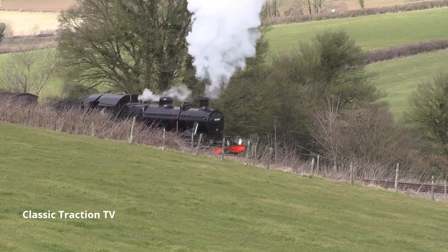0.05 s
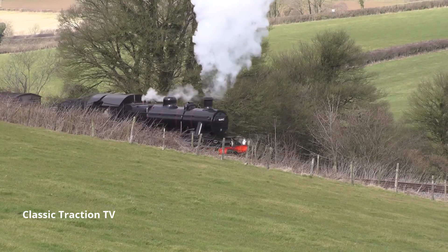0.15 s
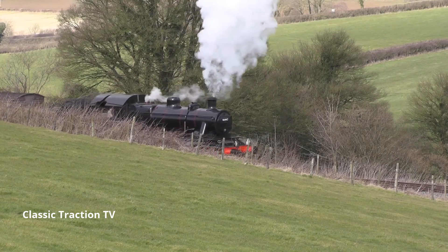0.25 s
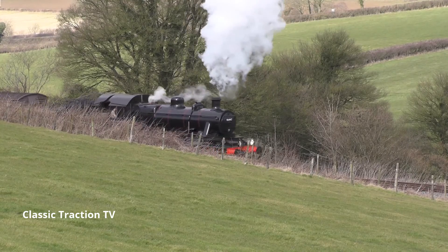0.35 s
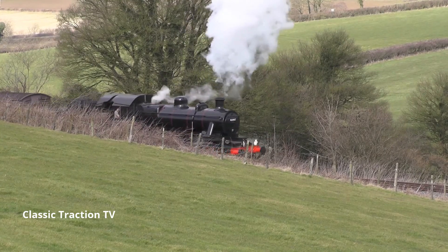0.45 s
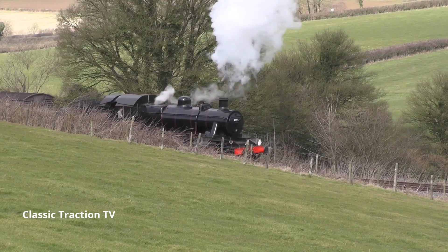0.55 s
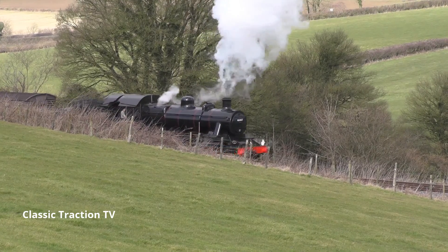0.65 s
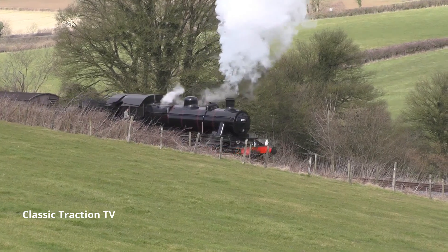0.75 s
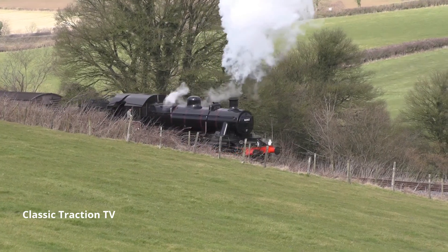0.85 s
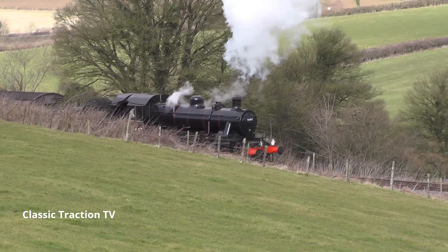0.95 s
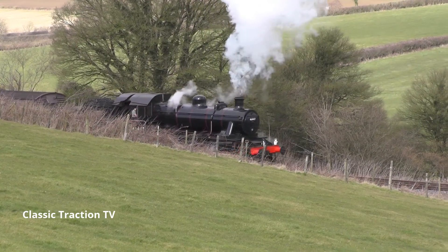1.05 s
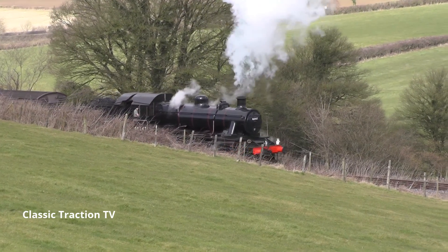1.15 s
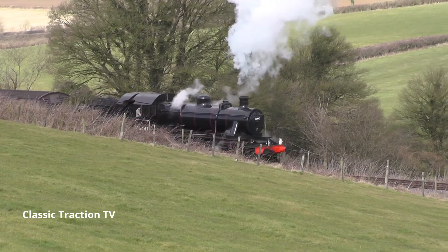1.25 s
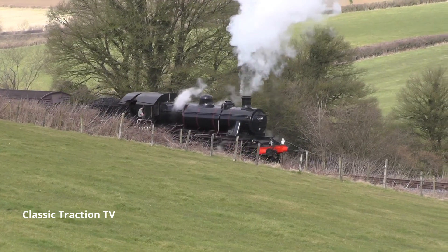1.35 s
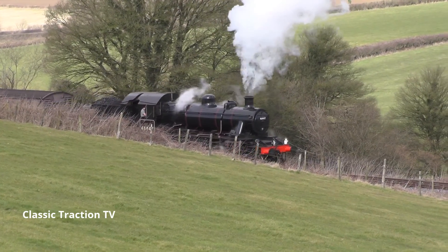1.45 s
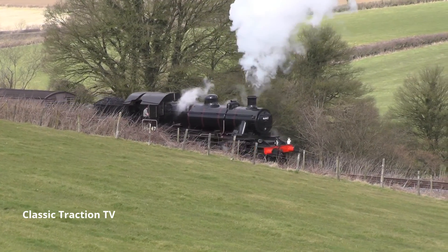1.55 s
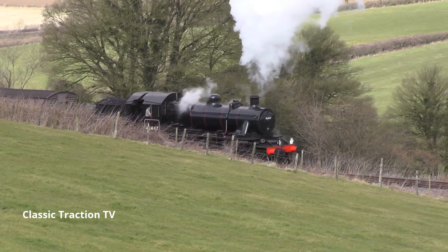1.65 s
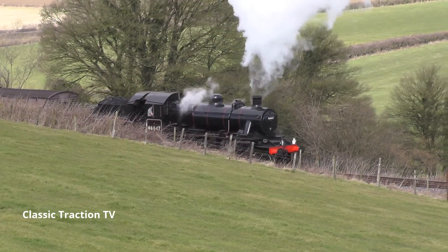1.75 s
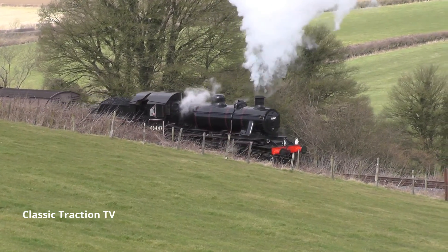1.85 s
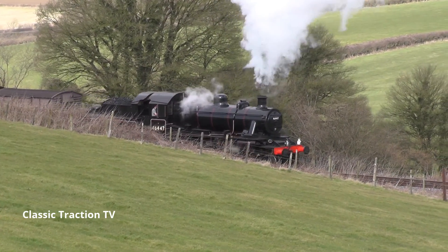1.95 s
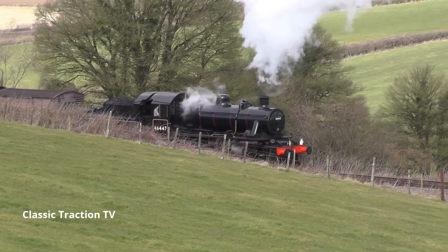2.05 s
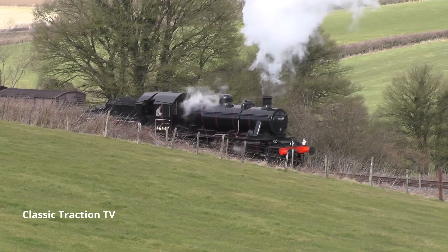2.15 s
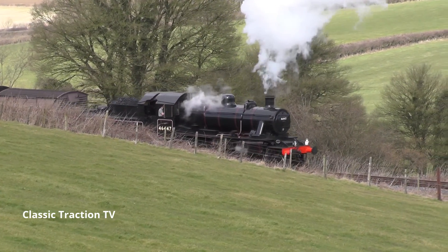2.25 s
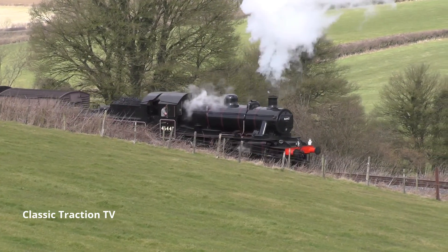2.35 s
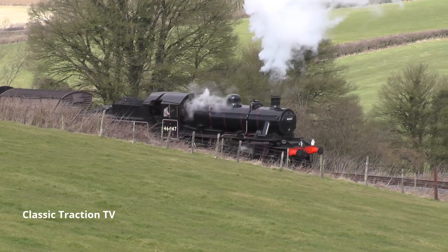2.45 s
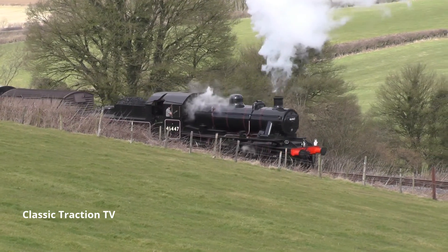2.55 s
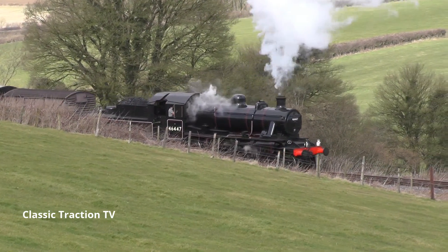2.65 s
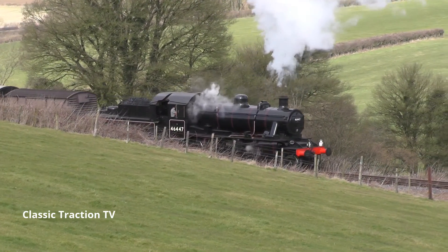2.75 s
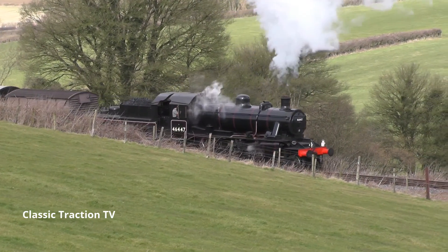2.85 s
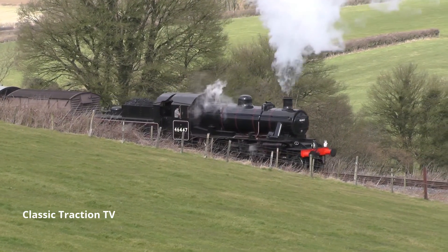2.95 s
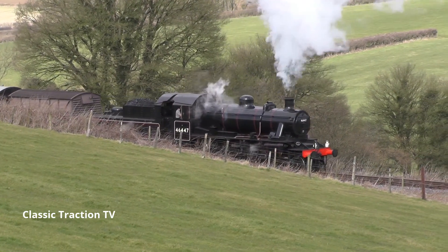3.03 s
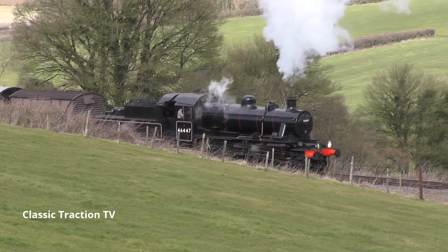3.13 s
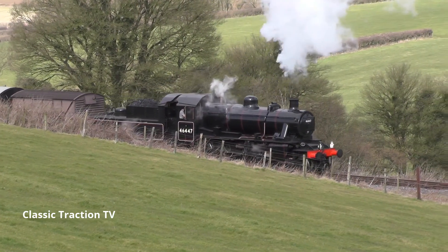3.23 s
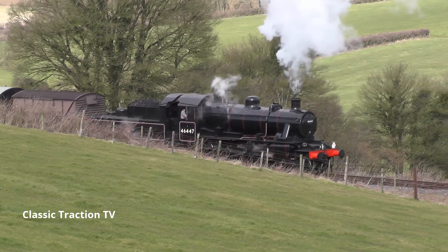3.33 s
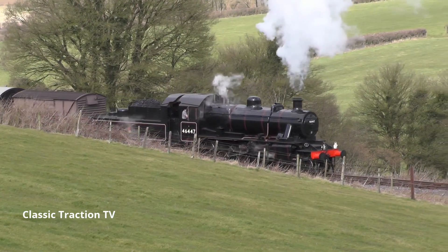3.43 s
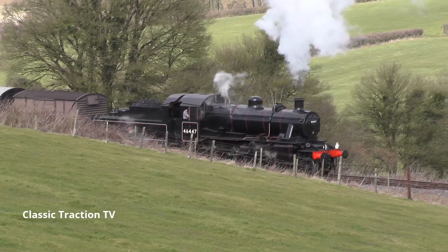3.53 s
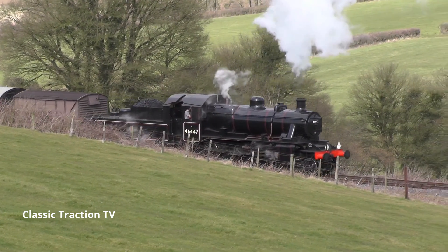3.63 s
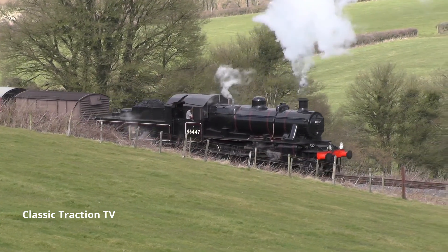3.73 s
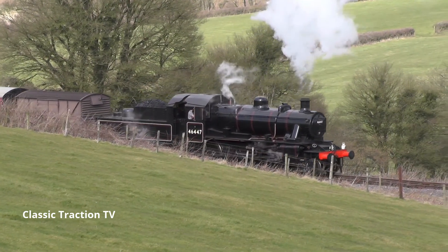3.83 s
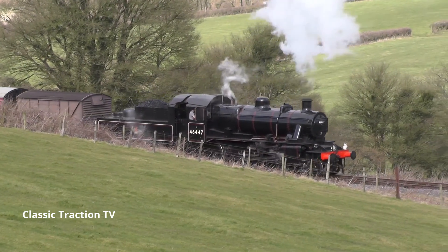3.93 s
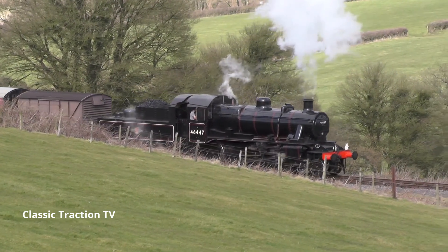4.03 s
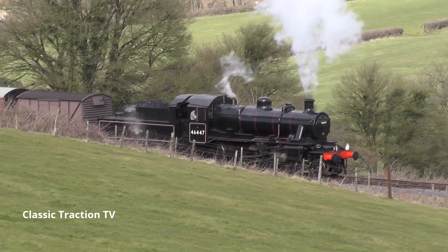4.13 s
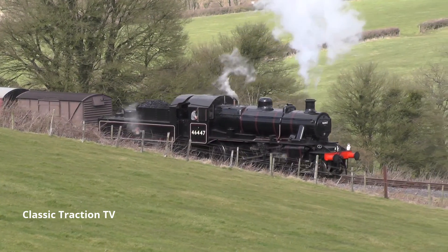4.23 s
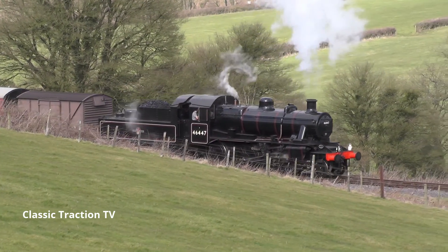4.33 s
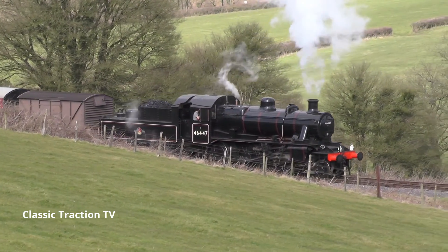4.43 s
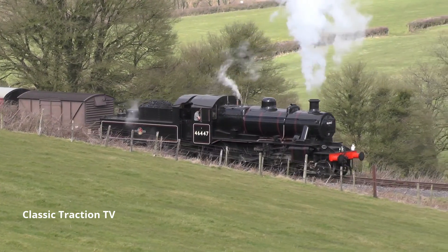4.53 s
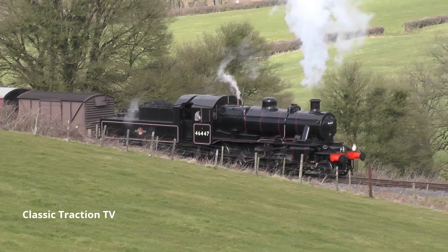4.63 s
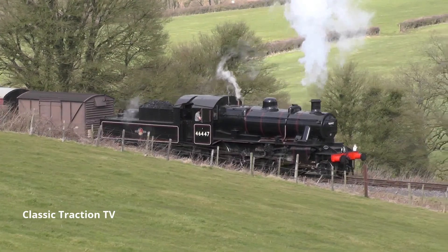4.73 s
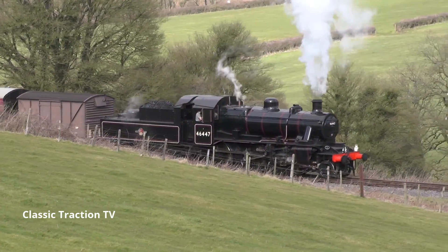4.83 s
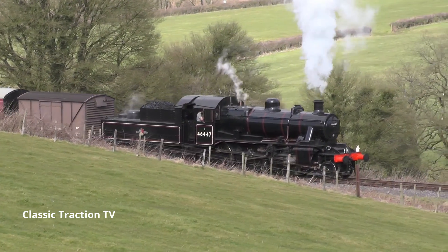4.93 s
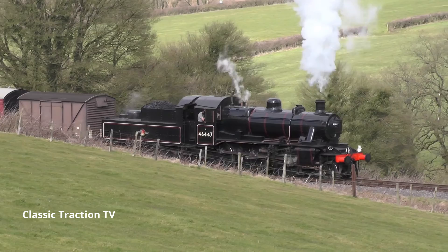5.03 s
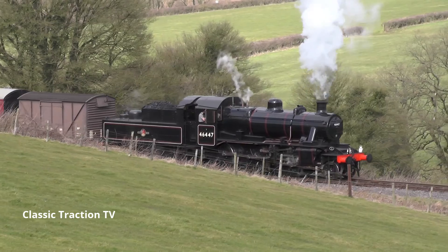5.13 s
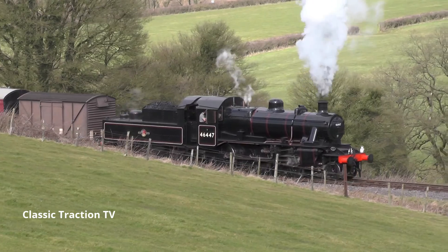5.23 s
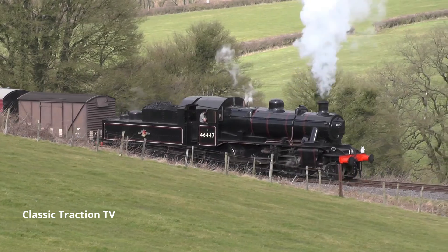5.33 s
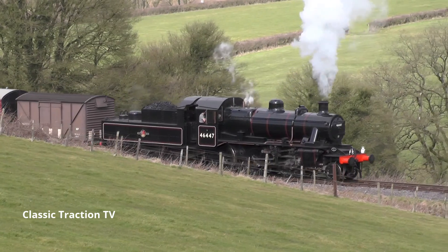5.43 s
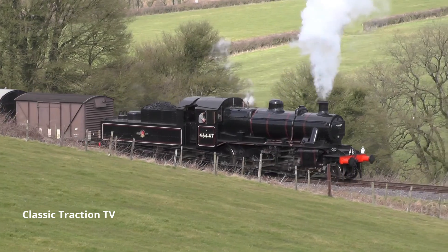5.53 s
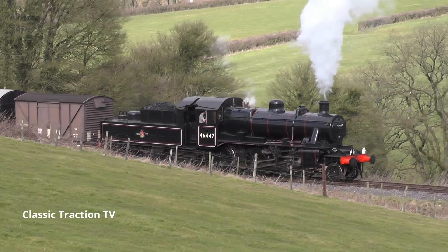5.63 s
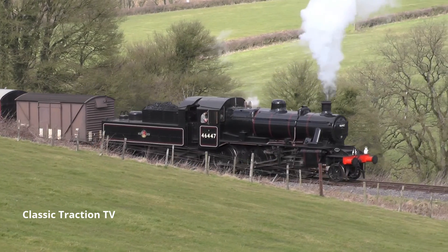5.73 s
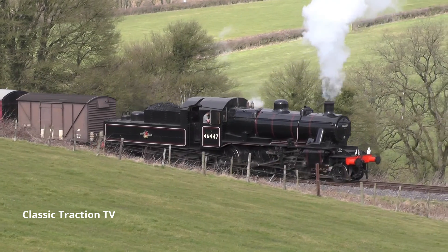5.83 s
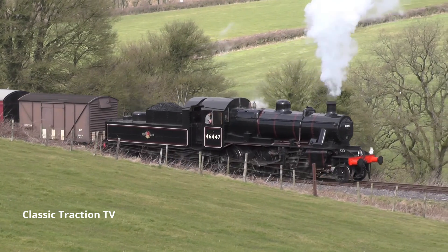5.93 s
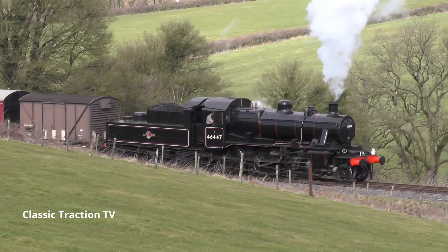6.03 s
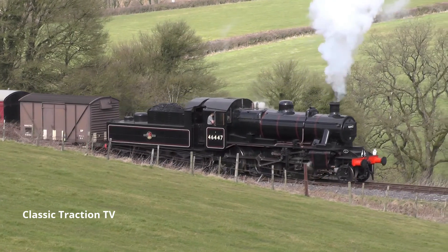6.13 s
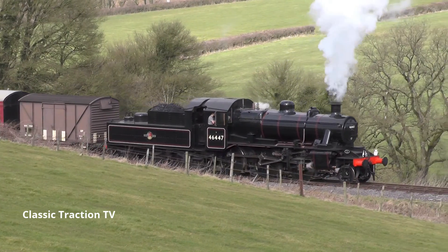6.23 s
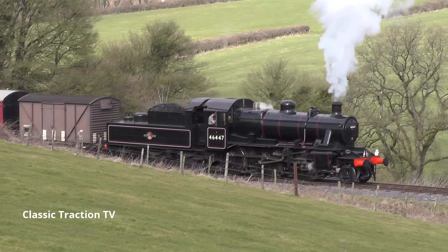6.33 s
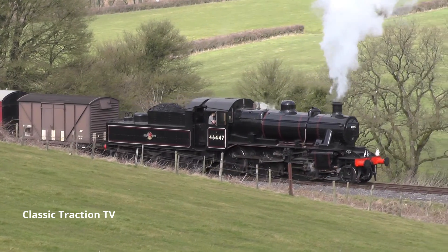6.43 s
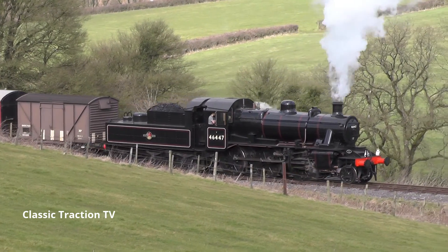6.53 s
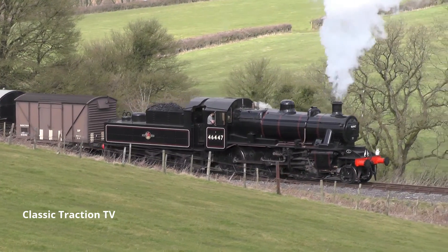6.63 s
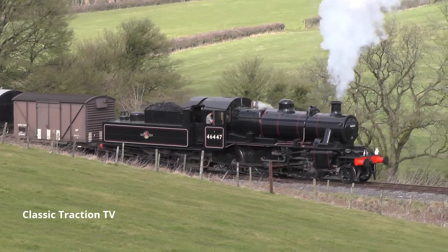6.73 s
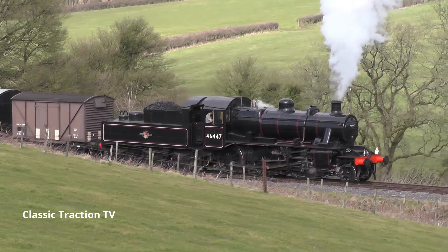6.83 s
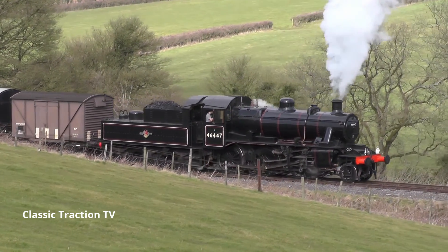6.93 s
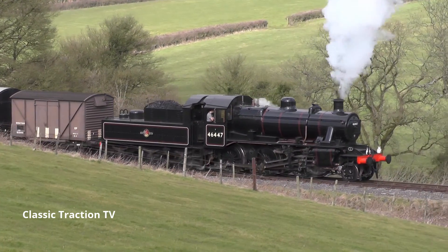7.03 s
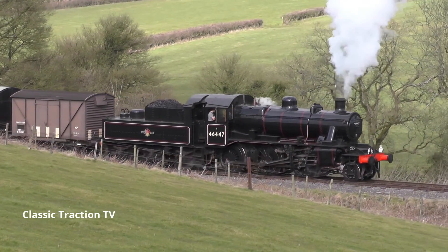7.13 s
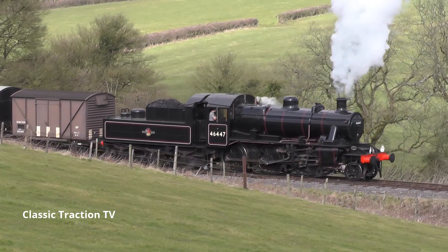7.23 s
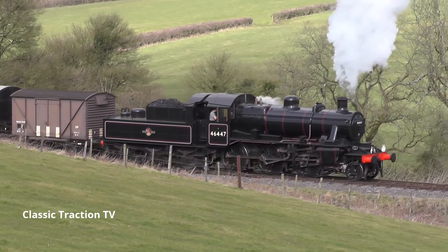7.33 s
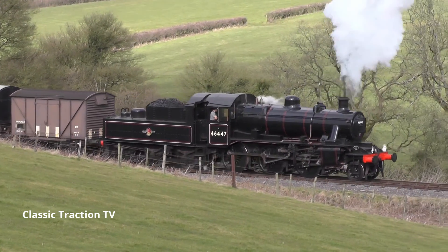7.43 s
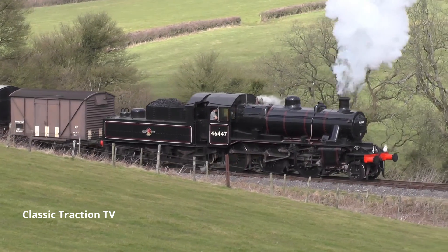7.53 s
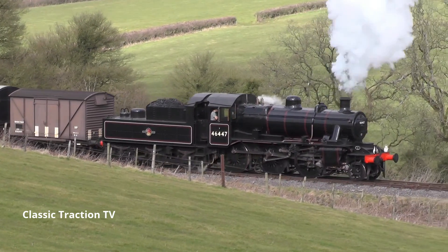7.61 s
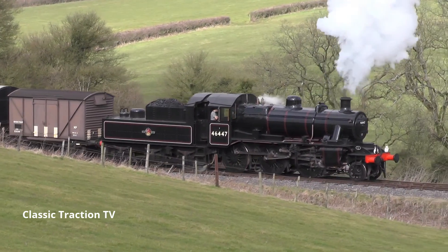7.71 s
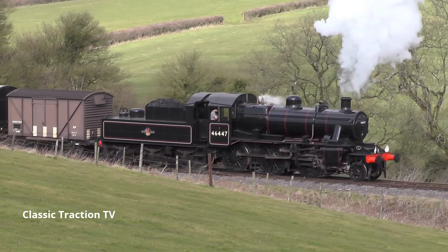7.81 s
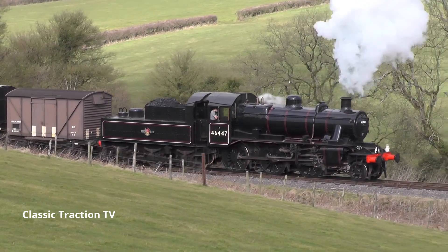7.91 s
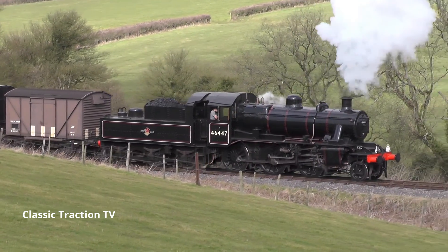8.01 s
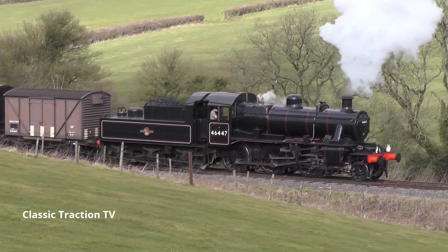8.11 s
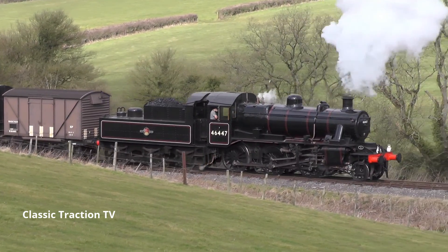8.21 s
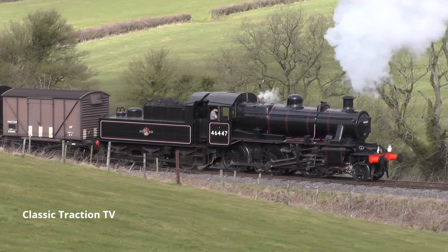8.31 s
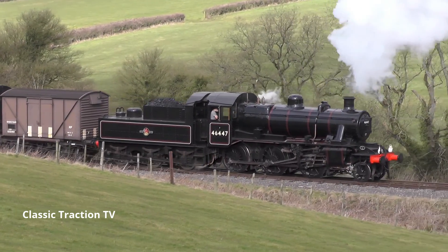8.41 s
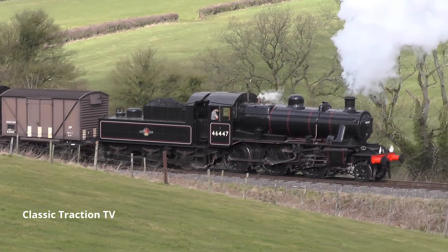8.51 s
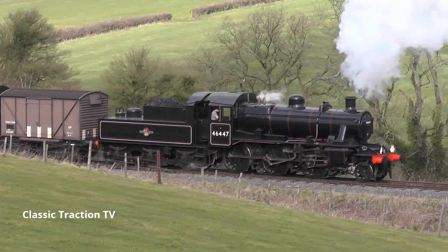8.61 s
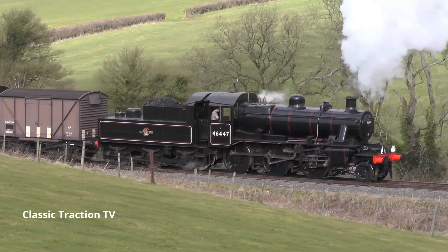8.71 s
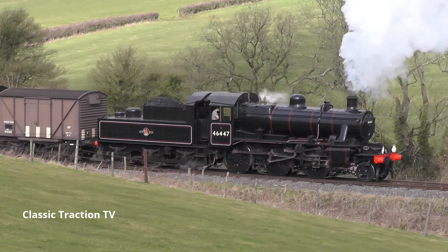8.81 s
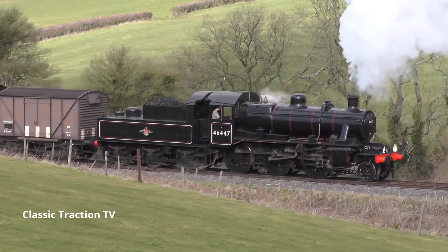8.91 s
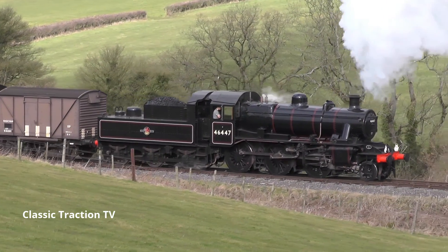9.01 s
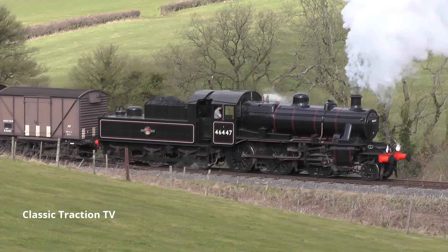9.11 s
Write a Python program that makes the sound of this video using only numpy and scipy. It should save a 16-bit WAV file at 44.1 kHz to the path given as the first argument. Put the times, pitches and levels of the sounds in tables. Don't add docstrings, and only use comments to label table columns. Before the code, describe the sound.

Hollow, booming steam-engine beats, about two and a half to three per second, grow louder across an open field over wheel rumble and wind thumps.

```python
import sys
import numpy as np
from scipy import signal
from scipy.fft import rfft, irfft, next_fast_len
from scipy.io import wavfile
from scipy.ndimage import uniform_filter1d

SR = 44100
rng = np.random.default_rng(int(sys.argv[2]) if len(sys.argv) > 2 else 0)


def int16_out(signal):
    q = np.round(np.clip(np.atleast_2d(signal).T, -1, 1) * 32767)
    wavfile.write(sys.argv[1], SR, q.astype(np.int16))


def nominal_scale(level):
    x = np.asarray(level, float) / 20
    return 10 ** x


N = 403956
SIZE = next_fast_len(N + 8192)
HZ = np.maximum(np.arange(SIZE // 2 + 1) * SR / SIZE, 1)

# [t/s, level/dB, half length/s, upper modes/dB]
BOOM_BEATS = [(0.073, -27, 0.035, -13), (.47, -28.5, .037, -4.5), (0.877, -27.5, 0.035, -10.5),
              (1.268, -28.5, .039, -6.5), (1.663, -28.5, 0.041, -9.5), (2.055, -31, 0.043, -7),
              (2.452, -27, .039, -7.5), (2.841, -29, .04, -7), (3.211, -24.5, 0.032, -10),
              (3.603, -27.5, 0.044, -7), (3.981, -23.5, .041, -11.5), (4.349, -23.5, .048, -9.5),
              (4.708, -23, 0.041, -8.5), (5.071, -23, 0.043, -6.5), (5.439, -20.5, 0.044, -8.5),
              (5.781, -22, 0.045, -7.5), (6.122, -23, 0.043, -9), (6.457, -21.5, .041, -6.5),
              (6.801, -19.5, 0.041, -6.5), (7.126, -19.5, 0.042, -12.5), (7.451, -20.5, 0.041, -8.5),
              (7.776, -21.5, 0.042, -13), (8.1, -19.5, 0.037, -9.5), (8.407, -20.5, 0.03, -14.5),
              (8.714, -20.5, 0.032, -12), (9.023, -22, 0.033, -7.5)]
# [t/s, level/dB]
BANK_CLEARING = [(0.1, -49), (0.9, -18), (1.7, -35.5), (2.4, -35), (3.2, -46), (4.0, -28), (5.4, -19.5),
                 (9.1, -21)]
# [f/Hz, width/Hz, level/dB]
SMOKEBOX_MODES = [(124, 62, 0)]
CHIMNEY_LOW_MODES = [(174, 42, 0), (207, 40, 0), (268, 55, -8)]
CHIMNEY_HIGH_MODES = [(342, 73, 7), (430, 45.4, 1.5), (504, 51, -14.5)]
SMOKEBOX_DB = -11.5

# [t/s, level/dB, bite/dB, edge/dB]
JET_BEATS = [(.047, -55, 1.5, 1.5), (.452, -55, -20, 1.5), (.861, -58.5, 12, 9.5), (1.259, -48.5, -7, -13),
             (1.64, -50, 2.5, -2), (2.032, -52.5, -2.5, -8.5), (2.432, -49.5, -6.5, -0.8),
             (2.822, -49.5, .8, -11), (3.195, -47, 1.2, -10), (3.583, -50.5, 0, 3), (3.963, -52, 10, -3),
             (4.345, -54, -0.5, 0.5), (4.703, -44.5, -1, -8), (5.063, -39.5, 0.5, -1),
             (5.421, -35, 0.8, -5.5), (5.768, -46, 3, -10), (6.113, -37, -2.1, -14), (6.452, -37, -5.5, -4),
             (6.799, -37, 0.7, -14), (7.122, -43, -4, -5), (7.449, -43, -10.5, -7.5),
             (7.773, -40, -1.7, -5), (8.092, -37.5, -2.5, -8), (8.401, -38.5, -13, -15),
             (8.712, -40.5, -9, -10.5), (9.028, -46.5, -8.5, -11.5)]
# [f/Hz, density/dB per Hz]
JET_SPECTRUM = [(200, -39), (500, 8), (750, 5), (1150, -2.5), (1800, 4.5), (3000, 2.5), (4300, -6.5),
                (6000, -10.5), (7400, -7), (8500, -14.5), (10200, -19), (12000, -19), (14000, -42)]
JET_HALF_S, JET_STRETCH = 0.03, 0.31
AIR_DB, AIR_FOLLOWS = -17.5, 0.34
FRONT_SKEW = 0.4

# [t/s, valve whistle/dB, cock whistle/dB, gland hiss/dB]
LEAK_LEVELS = [(0.0, -74, -67.5, -76), (0.43, -75, -70.5, -65), (0.72, -64, -66, -63),
               (1.1, -67, -67.5, -70), (1.55, -62.5, -61.5, -65), (1.84, -63, -65, -64),
               (2.07, -68, -69, -69.5), (2.93, -61.5, -61.5, -64), (3.2, -62, -63.5, -68),
               (3.55, -62.5, -60, -61), (4.28, -69.5, -75.5, -68), (4.75, -68, -66.5, -56.5),
               (5.23, -52.5, -53.5, -58), (5.79, -66, -66, -66.5), (6.1, -55, -60.5, -65.5),
               (6.65, -60, -61, -60.5), (7.3, -62.5, -66, -67.5), (7.95, -58, -62, -62)]
# [f/Hz, width/Hz, level/dB]
VALVE_WHISTLES = [(743, 30, -13), (860, 40, -12), (1905, 115, -.5), (2310, 110, -7), (2860, 120, -13)]
COCK_WHISTLES = [(3380, 170, 1), (3750, 220, -6), (4150, 300, -9)]
GLAND_WHISTLES = [(5440, 330, -2), (6030, 260, -7), (6700, 380, 0), (7350, 420, -1)]
# [f/Hz, density/dB per Hz]
GLAND_SPECTRUM = [(100, -38), (600, -33), (1300, -10.5), (2500, -3), (4000, -3), (7400, -2), (8300, -4.5),
                  (9500, -6.5), (10500, 1.5), (12000, -17.5), (14000, -39.5)]
FADE_DB_PER_S = 5.5
HISS_FLUTTER_DB = 2.2
PITCH_WAVER = 0.012

# [t/s, rumble/dB, roar/dB]
ROLLING = [(0.0, -62, -85), (0.18, -53, -70), (1.1, -51, -66.5), (2.0, -52, -70), (3.1, -51, -71),
           (4.2, -51, -67.5), (5.3, -49, -70.5), (6.2, -51, -64.5), (7.1, -48, -63.5), (8.4, -46.5, -65.5),
           (9.16, -42, -61)]
# [f/Hz, density/dB per Hz]
RUMBLE_SPECTRUM = [(15, -27), (40, 5), (100, -3.5), (200, 3.5), (300, -2), (420, -6), (560, -20),
                   (900, -31), (3000, -93.5)]
ROAR_SPECTRUM = [(60, -28), (300, -23.5), (500, 5), (800, 5), (1300, -1.5), (2500, -4.5), (5000, -26),
                 (12000, -59)]

HILL_T60_S, HILL_DB = 0.43, -20

# [f/Hz, left louder/dB, left leads/rad, likeness/0-1]
PORT_DIFFERENCE = [(100, 4.8, .01, .985), (700, 3.4, .08, .98), (2700, 2.5, .3, .97),
                   (4100, -1.3, 1.4, .96), (4700, 1.2, 1.95, .96), (5600, 4.0, 2.1, .93),
                   (7300, 7.8, 2.0, .9), (8100, 2.0, 1.7, .83), (8800, -.5, 2.0, .78),
                   (9300, -2.3, 2.5, .9), (9700, 0, 3.1, .9), (12000, 0, 3.1, .3), (13400, 1.5, 3.1, .1)]
OPPOSED_BAND_HZ = 9650, 11900
SHIMMER_HZ = 12.4

# [t/s, level/dB]
BREEZE_LEVEL = [(0.0, -51), (0.4, -54), (0.97, -68), (1.63, -54.5), (2.2, -41), (2.7, -54), (3.5, -45),
                (4.0, -49), (4.3, -48), (4.75, -53), (5.1, -51), (5.8, -42), (6.3, -37), (6.7, -30.5),
                (7.0, -48.5), (7.5, -30.5), (8.15, -32.5), (8.5, -28)]
# [t/s, level/dB, half length/s, left-right/dB]
GUST_HITS = [(2.093, -36, 0.057, 4.5), (2.35, -35.5, 0.11, 13), (2.745, -34, 0.042, 5),
             (3.116, -40, 0.068, 9), (3.4, -33.5, 0.044, 8), (3.5, -36, .05, 14), (3.704, -36, 0.038, 13),
             (3.913, -30, .08, 5), (4.136, -40, 0.025, 15), (4.43, -36, 0.031, 7), (4.71, -32.5, 0.061, 7),
             (5.614, -30.5, 0.046, -1), (5.8, -37, 0.022, -14), (5.97, -29.5, .06, 6),
             (6.18, -22, 0.034, 11), (6.28, -16, 0.041, 2), (6.405, -29, 0.033, 6), (6.623, -26, 0.1, 11),
             (6.792, -30.5, 0.092, 3), (7.033, -26.5, 0.023, -0.5), (7.194, -26.5, 0.059, 15),
             (7.42, -31, .04, -18), (7.526, -21.5, 0.079, 15.5), (7.847, -13.5, 0.018, 4),
             (8, -18.5, 0.046, 5.5), (8.426, -21.5, .025, 0), (8.48, -15, 0.063, 2.5),
             (8.738, -14.5, 0.072, 2), (8.95, -16.5, 0.03, -3), (9.114, -19, 0.071, 10)]
# [f/Hz, density/dB per Hz]
BUFFET_SPECTRUM = [(5, -36), (12, 1), (22, 4.5), (34, -3), (48, -9), (80, -22.5), (400, -100)]
FLUTTER_SPECTRUM = [(30, -20), (50, 0), (85, -4), (150, -19), (300, -35), (600, -50), (2500, -100)]
BREEZE_PAN_DB, BREEZE_BUFFET_DB = 4.5, 2
GUST_FLUTTER_DB = -9.5
FLUTTER_PER_PAN = -0.83

# [f/Hz, density/dB per Hz]
CAPSULE_SPECTRUM = [(1000, -19), (4000, -4), (9000, -1), (11300, -3.5), (12200, -7), (13500, -2),
                    (15600, -11)]


def boom():
    t_s, db, half_s, upper_db = np.transpose(BOOM_BEATS)
    throat_db = np.interp(t_s, *np.transpose(BANK_CLEARING))

    box = puffs(t_s, db + SMOKEBOX_DB, 1.5 * half_s, 6.5, lag_s=0.0022, skew=0.1)
    box = box * noise(modes(SMOKEBOX_MODES))
    low = puffs(t_s, db + 0.82, 1.046 * half_s, 2.59, lag_s=0.0012, skew=0.089)
    low = low * evened(noise(modes(CHIMNEY_LOW_MODES)), 0.09)
    high = puffs(t_s, db + upper_db, 0.87 * half_s, 3.2, lag_s=-0.0046, skew=0.076)
    high = high * noise(modes(CHIMNEY_HIGH_MODES))

    throat = puffs(t_s, db + throat_db + 1.0, 0.79 * half_s, 2.47, lag_s=-0.0076, skew=0.091)
    throat = throat * noise(nominal_scale(on_grid(JET_SPECTRUM)) * between(390, 1460))
    lumps = nominal_scale(1.07 * drift(41))
    return (box + low + high) * lumps + throat


def jet():
    t_s, db, bite_db, edge_db = np.transpose(JET_BEATS)
    boom_half_s = np.transpose(BOOM_BEATS)[2]
    half_s = JET_HALF_S + JET_STRETCH * (boom_half_s - boom_half_s.mean())
    air_db = AIR_DB + AIR_FOLLOWS * edge_db
    tone = nominal_scale(on_grid(JET_SPECTRUM))

    core = puffs(t_s, db + 0.3, 0.94 * half_s, 1.68, lag_s=0.002, skew=0.082)
    core = core * noise(tone * between(1040, 2700)) * nominal_scale(1.8 * drift(25))
    bite = puffs(t_s, db + bite_db + 0.53, 0.97 * half_s, 1.58, lag_s=-0.003, skew=0.22)
    bite = bite * noise(tone * between(3080, 4700)) * nominal_scale(1.7 * drift(30))
    edge = puffs(t_s, db + edge_db - 0.6, 1.3 * half_s, 2.5, lag_s=-0.0057, skew=FRONT_SKEW)
    edge = edge * noise(tone * between(5170, 5500)) * nominal_scale(1.86 * drift(30))
    air = puffs(t_s, db + air_db - 0.6, 1.8 * half_s, 3.8, lag_s=-0.004, skew=0.3)
    air = air * noise(tone * between(7000, 16000)) * nominal_scale(3.0 * drift(25))
    return core + bite + edge + air


def leaks():
    since_swell_s = np.maximum(np.arange(N) / SR - LEAK_LEVELS[-1][0], 0)
    valve_db, cock_db, hiss_db = np.array(in_time(LEAK_LEVELS)) - FADE_DB_PER_S * since_swell_s

    low = nominal_scale(valve_db + 1.5) * whistles(VALVE_WHISTLES, flicker_db=2.4, rate_hz=10)
    high = nominal_scale(cock_db + 0.6) * whistles(COCK_WHISTLES, flicker_db=2.6, rate_hz=10)
    ring = nominal_scale(hiss_db - 5.5) * whistles(GLAND_WHISTLES, flicker_db=6.0, rate_hz=10)

    tone = nominal_scale(on_grid(GLAND_SPECTRUM))
    dull_db = 0.5 * (hiss_db + cock_db) + 4.5 + 0.9 * drift(3.1)
    dull = nominal_scale(dull_db) * noise(tone * between(100, 4800))
    bright_db = hiss_db + 2.5 + HISS_FLUTTER_DB * drift(9.6)
    bright = nominal_scale(bright_db) * noise(tone * between(4800, 7300))
    thin_db = hiss_db - 11.5 + 1.8 * drift(4)
    thin = nominal_scale(thin_db) * noise(tone * between(8300, 16000))
    return low + high + ring + dull + bright + thin


def whistles(table, flicker_db, rate_hz):
    out = 0
    for hz, width_hz, db in table:
        push = drift(rate_hz)
        breath = evened(noise(modes([(hz, width_hz, 0)])), 0.1)
        position = np.round(np.cumsum(1 + PITCH_WAVER * push)).astype(int) % N
        out = out + nominal_scale(db + flicker_db * push) * breath[position]
    return out


def wheels():
    rumble_db, roar_db = in_time(ROLLING)
    rumble = nominal_scale(rumble_db + 2.5 + 1.12 * drift(2.7)) * noise(nominal_scale(on_grid(RUMBLE_SPECTRUM)))
    roar = nominal_scale(roar_db + 4.5 + 0.59 * drift(3.5)) * noise(nominal_scale(on_grid(ROAR_SPECTRUM)))
    return rumble + roar


def hillside(x):
    t = np.arange(30000) / SR
    onset = np.clip(t / 0.072, 0, 1)
    tail = rng.standard_normal(len(t)) * nominal_scale(-60 * t / HILL_T60_S) * onset
    return nominal_scale(HILL_DB) * signal.fftconvolve(x, tail / np.sqrt(np.sum(tail ** 2)))[:N]


def ports(x):
    shade = nominal_scale(-on_grid(PORT_DIFFERENCE))
    delay = np.exp(-1j * on_grid(PORT_DIFFERENCE, axis=2))
    alike = on_grid(PORT_DIFFERENCE, axis=3)
    opposed = (HZ > OPPOSED_BAND_HZ[0]) & (HZ < OPPOSED_BAND_HZ[1])
    direct = rfft(x, SIZE) * np.where(opposed, -1, shade * alike * delay)

    scatter = np.exp(1j * np.cumsum(rng.normal(0, 0.12, len(HZ))))
    shimmering = x * np.sqrt(2) * np.cos(2 * drift(SHIMMER_HZ))
    scattered = rfft(shimmering, SIZE) * ~opposed * shade * np.sqrt(1 - alike ** 2) * scatter
    return np.array([x, irfft(direct + scattered, SIZE)[:N]])


def wind():
    breeze_db, = in_time(BREEZE_LEVEL)
    t_s, db, half_s, pan_db = np.transpose(GUST_HITS)
    out = []
    for side in (0.5, -0.5):
        breeze = nominal_scale(breeze_db + side * BREEZE_PAN_DB)
        gusts = puffs(t_s, db + side * pan_db, half_s, 1.5, lag_s=0, skew=0)
        shaking_db = db + GUST_FLUTTER_DB + (FLUTTER_PER_PAN + 0.3 * side) * pan_db
        shaking = puffs(t_s, shaking_db, 1.15 * half_s, 1.26, lag_s=0, skew=0)

        buffet = nominal_scale(1.5) * evened(noise(nominal_scale(on_grid(BUFFET_SPECTRUM))), 0.12)
        flutter = nominal_scale(2.73 * drift(10)) * evened(noise(nominal_scale(on_grid(FLUTTER_SPECTRUM))), 0.14)
        buffeting = np.hypot(nominal_scale(BREEZE_BUFFET_DB) * breeze, gusts) * buffet
        fluttering = np.hypot(nominal_scale(-2.0) * breeze, shaking) * flutter
        out.append(buffeting + fluttering)
    return np.array(out)


def capsule_hiss():
    return nominal_scale(-72.0) * np.array([noise(nominal_scale(on_grid(CAPSULE_SPECTRUM))) for side in range(2)])


def puffs(times_s, levels_db, halves_s, squareness, lag_s, skew):
    out, t = np.zeros(N), np.arange(N) / SR
    for start_s, db, half_s in zip(times_s, levels_db, halves_s):
        near = slice(max(int((start_s - 0.25) * SR), 0), int((start_s + 0.25) * SR))
        late = (t[near] - start_s - lag_s) / half_s + skew
        late = late / (1 + skew * np.sign(late))
        out[near] += nominal_scale(db) * np.exp(-0.5 * np.abs(late) ** squareness)
    return out


def modes(table):
    power = 0
    for hz, width_hz, db in table:
        detuning = (HZ - hz ** 2 / HZ) / width_hz
        power = power + nominal_scale(db) ** 2 / (1 + detuning ** 2) ** 1.92
    return np.sqrt(power)


def between(low_hz, high_hz):
    return np.sqrt(1 / (1 + (low_hz / HZ) ** 8) / (1 + (HZ / high_hz) ** 8))


def noise(gain):
    return rms_one(irfft(rfft(rng.standard_normal(SIZE)) * gain, SIZE)[:N])


def evened(x, seconds):
    return x / np.sqrt(uniform_filter1d(x ** 2, int(seconds * SR)) + 0.1)


def drift(rate_hz):
    r = np.exp(-80 * np.pi * rate_hz / SR)
    slow = signal.lfilter([1], [1, -2 * r, r * r], rng.standard_normal(N // 40 + 2002))
    slow = slow[2000:]
    return np.interp(np.arange(N) / 40, np.arange(len(slow)), rms_one(slow))


def rms_one(x):
    return x / np.sqrt(np.mean(x ** 2) + 1e-20)


def in_time(rows):
    t_s, *columns = np.transpose(rows)
    return [np.interp(np.arange(N) / SR, t_s, column) for column in columns]


def on_grid(points, axis=1):
    points = np.array(points)
    return np.interp(np.log(HZ), np.log(points[:, 0]), points[:, axis])


def scene():
    blast = boom()
    train = blast + hillside(blast) + jet() + leaks() + wheels()
    return wind() + ports(train)


def roll_off(x):
    return signal.sosfilt(signal.butter(12, 15720, fs=SR, output="sos"), x)


def record(dry):
    mix = dry + capsule_hiss()
    return roll_off(mix)


dry = scene()
out = record(dry)
int16_out(out)
```